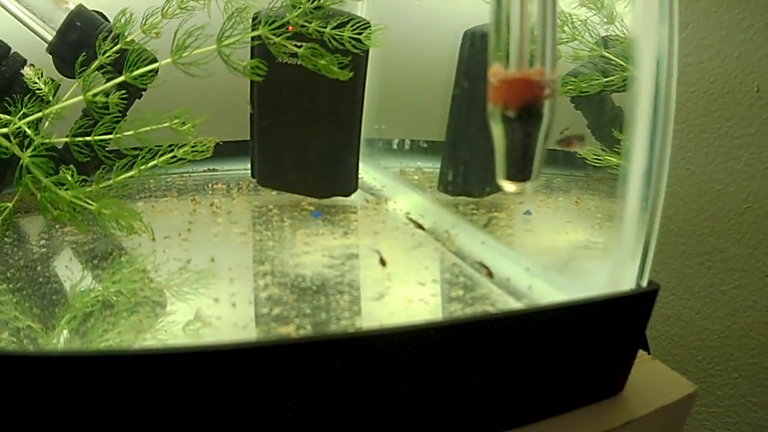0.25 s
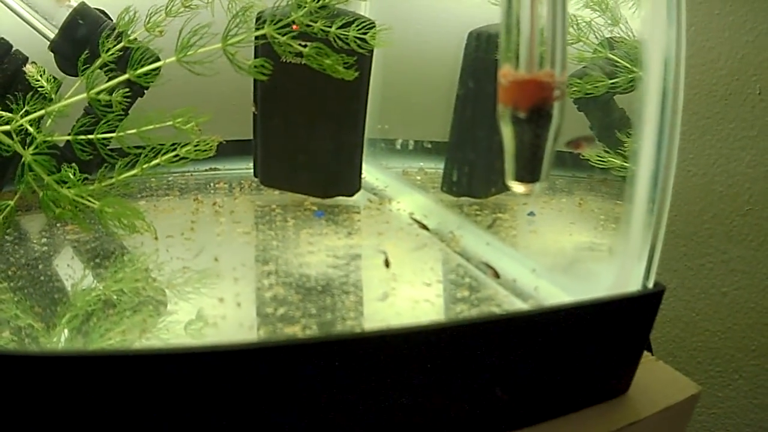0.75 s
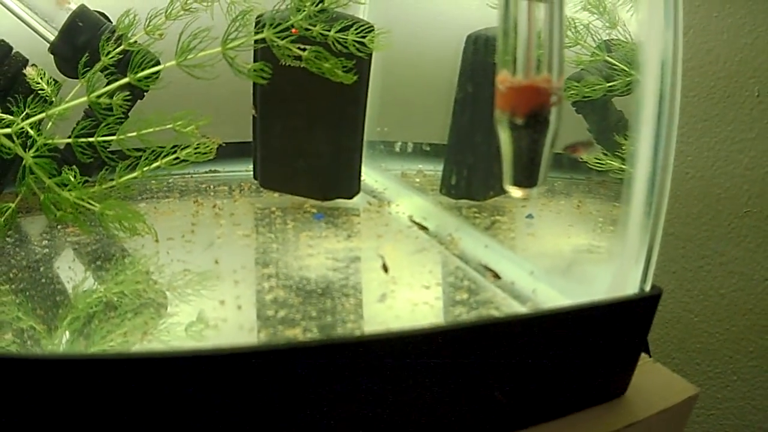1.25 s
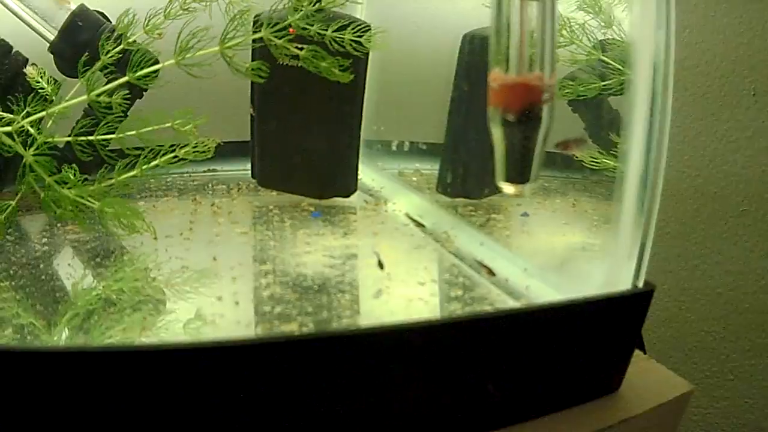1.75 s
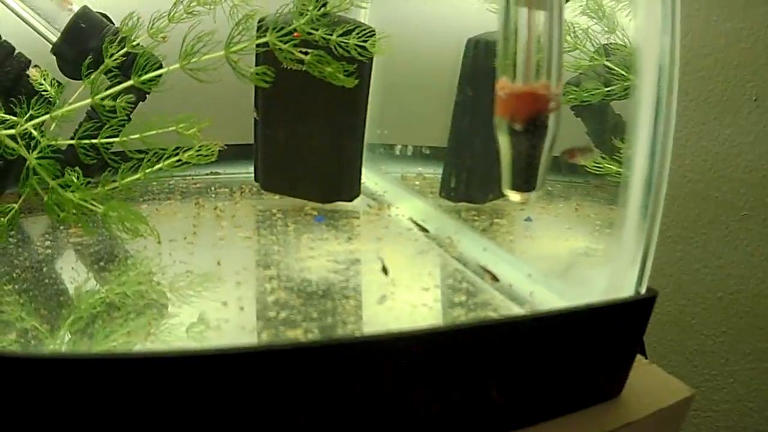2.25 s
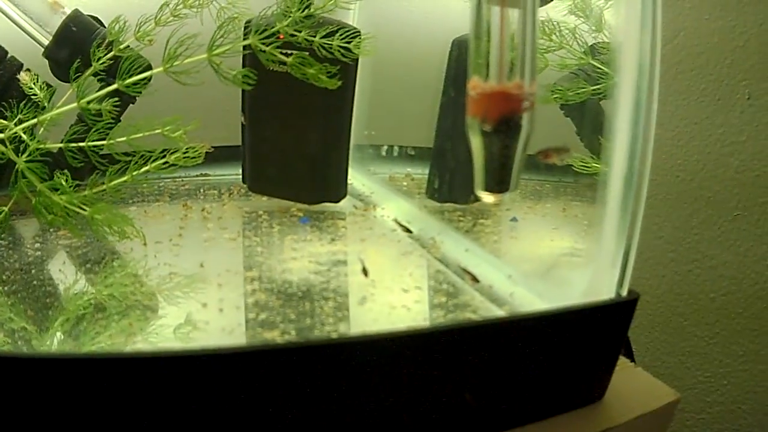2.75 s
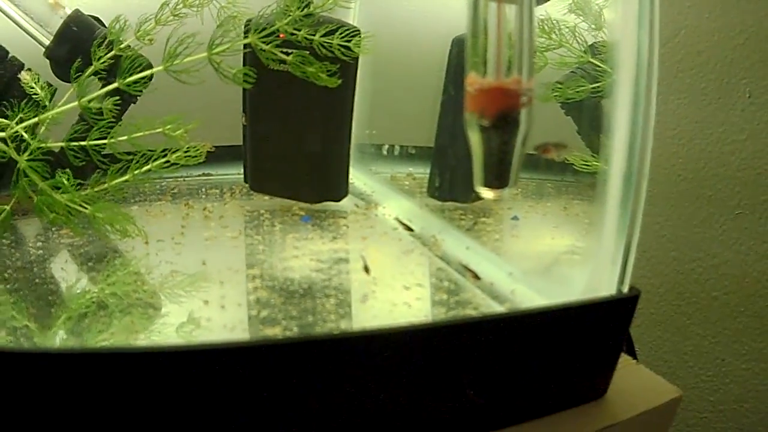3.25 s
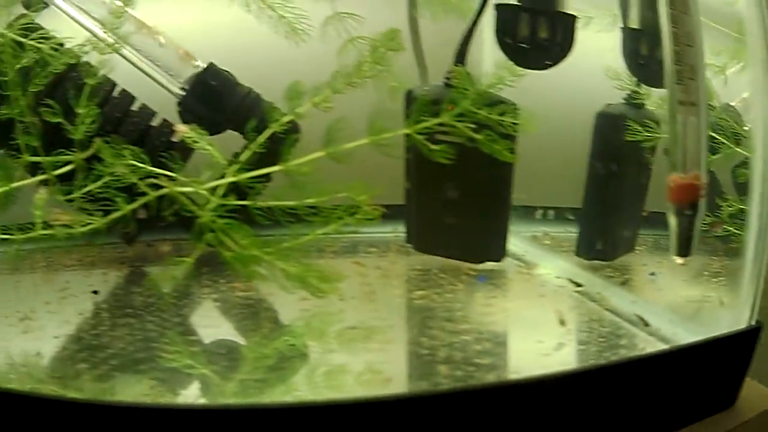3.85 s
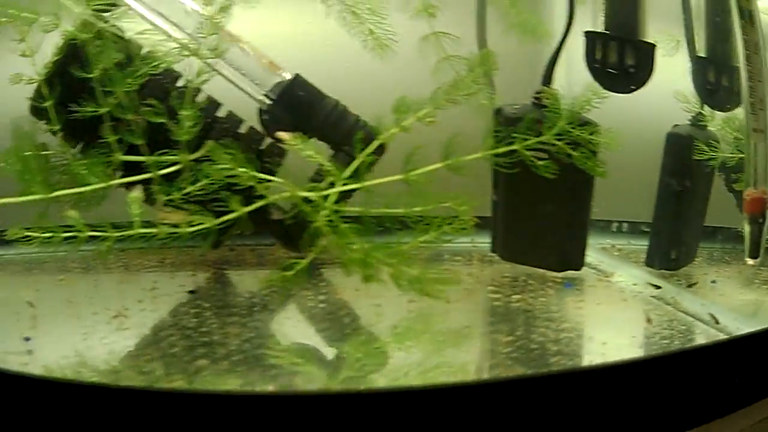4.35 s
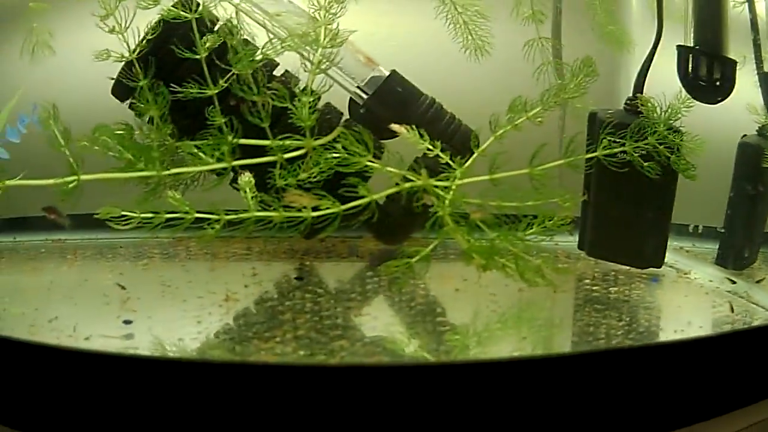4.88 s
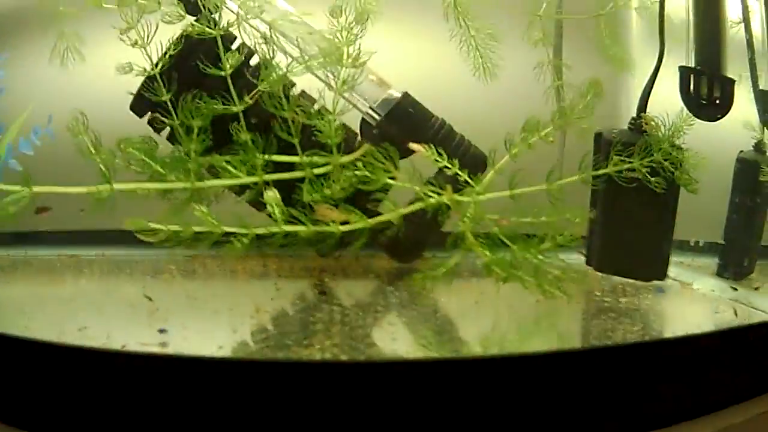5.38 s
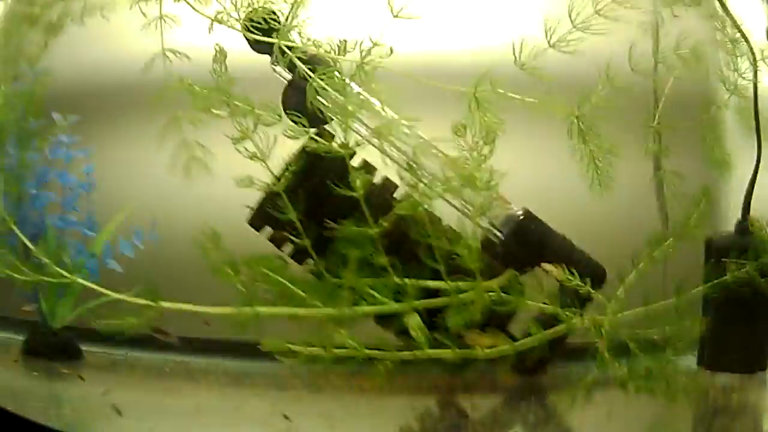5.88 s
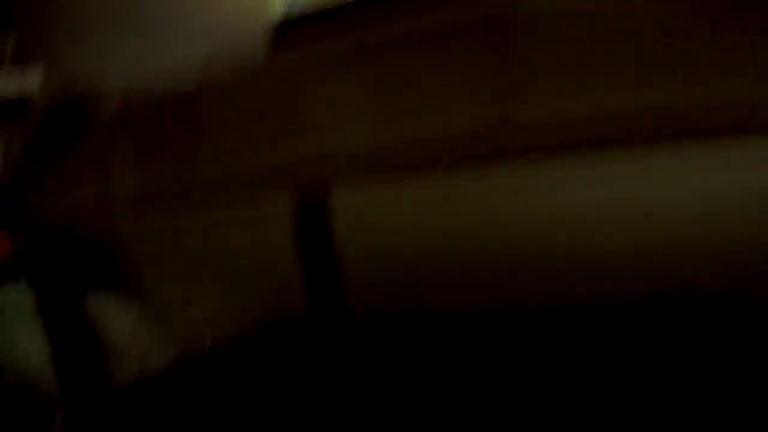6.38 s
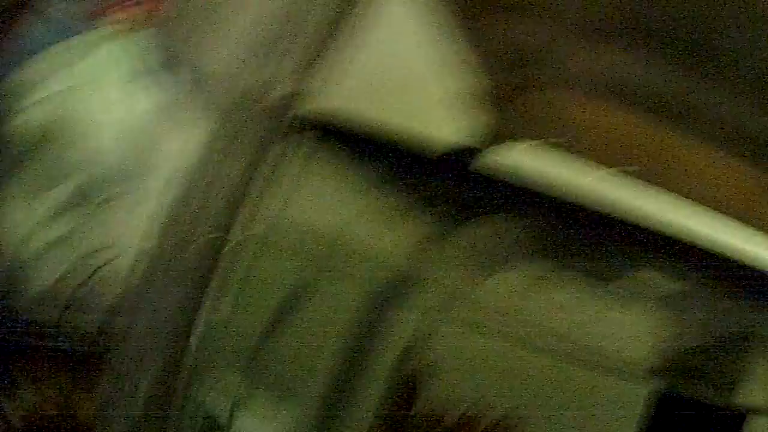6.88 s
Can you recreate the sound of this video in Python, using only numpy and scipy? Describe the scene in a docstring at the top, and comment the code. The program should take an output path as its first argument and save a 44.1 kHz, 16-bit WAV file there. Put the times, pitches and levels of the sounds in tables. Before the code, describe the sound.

An aquarium pump hums steadily with a thin whine, until clicks and one hard knock hit the microphone near the end.

```python
"""An aquarium air pump hums at mains frequency beside a small whining motor, over the soft wash of filters and
air. A hand-held camera drifts past the tank and swings away: its case clicks, creaks and takes one hard knock.
The sound is mono and narrow-band, ending near 4 kHz, and the input overloads on the knock."""
import sys
import numpy as np
from scipy.fft import rfft, irfft, next_fast_len
from scipy.io import wavfile
from scipy.ndimage import map_coordinates

SR = 44100
rng = np.random.default_rng(int(sys.argv[2]) if len(sys.argv) > 2 else 0)


def inscribe(sig):
    """Save sig as 16-bit PCM at rate SR to the path in sys.argv[1].

    A 1-D sig is mono; a 2-D sig holds one channel per row.
    Samples are clipped to [-1, 1] before scaling.
    """
    pcm = np.round(np.clip(np.atleast_2d(sig).T, -1, 1) * 32767)
    wavfile.write(sys.argv[1], SR, pcm.astype(np.int16))


N = 313991

# the drones as the microphone moves: (s, pump dB, whine order 2 dB, whine order 3 dB)
DRONES = [(0.0, -17.5, -41.5, -45), (0.42, -18, -39.5, -60.5), (1.57, -17.5, -39.5, -56.5), (1.72, -18, -40, -54.5),
          (1.94, -18, -39, -54), (2.64, -18, -39.5, -51), (3.09, -18, -39, -59.5), (3.47, -18, -40, -56.5),
          (3.77, -18, -41, -53), (3.98, -18, -40.5, -46), (5.43, -19, -40.5, -36), (5.89, -19.5, -41, -37.5),
          (6.27, -19, -41, -37), (6.41, -20, -44.5, -34.5), (6.56, -22.5, -41.5, -38), (6.76, -23.5, -39, -48.5),
          (6.98, -27, -34.5, -54), (7.12, -29, -36.5, -47.5)]
MAINS_HZ = 60  # fixed
WHINE_HZ = 166.7  # fixed
# overtones of the pump's diaphragm: (multiple of mains, dB re the fundamental)
PUMP = [(2, -28), (3, -26), (4, -29.5), (5, -27.5), (7, -32.5), (9, -33), (10, -36.5), (15, -38)]
# weak upper lines of the motor: (order, dB rms)
WHINE = [(4, -48.5), (5, -58), (6, -58)]
# moving water and air: (Hz, dB per Hz)
WASH = [(20, -2.5), (45, -3.5), (100, -6), (170, -5.5), (290, -4), (450, -3.5), (580, -8.5), (750, -6), (1000, -11), (1350, -15.5), (2000, -25.5), (4000, -34)]
# even hiss: (Hz, dB per Hz)
HISS = [(500, -17), (1100, -12.5), (1500, -10), (1850, -4.5), (2100, 1), (2400, 3), (2650, -4.5), (3200, -5), (3700, -7), (4200, -11)]
# (s, wash dB, hiss dB)
BED = [(0, -36.5, -40), (3.5, -36.5, -40), (4.5, -37.5, -40), (5.4, -37.5, -39), (6.3, -38, -39), (6.8, -38.5, -40.5), (7.12, -37, -34.5)]
# plastic case of the camera: (Hz, width Hz, dB)
CASE = [(1055, 160, -4.5), (1230, 180, -2), (1890, 240, -8.5), (2600, 230, -1.5), (2686, 280, -4.5), (3470, 850, -15)]
# clicks of the case: (s, peak dB, pitch Hz, life in cycles)
CLICKS = [(5.5315, -11, 1000, 3.2), (5.561, 1, 2480, 4.4), (5.5975, -20.5, 1700, 5), (5.726, -20, 2300, 6), (5.7886, -24.5, 1300, 5.9), (5.8813, -15.5, 1270, 14),
          (5.903, -14.5, 2200, 6), (5.9203, -2.5, 3450, 3.1), (5.9701, -11.5, 1400, 6.4), (6.3793, -6.5, 1560, 3.6), (7.0307, 3.5, 1320, 5.5), (7.0342, -11.5, 2370, 14)]
# creaks under the fingers: (start s, length s, rms dB)
CREAKS = [(5.926, 0.02, -23.5), (6.0962, 0.041, -19.5), (7.0146, 0.0084, -22)]
# contacts that bump the camera: (s, signed push in full scales, push time s, rattle dB, rattle t60 s)
BUMPS = [(6.0054, -.7, 0.0022, -9.5, 0.029), (6.008, -0.22, .002, 8, .045), (6.0126, -1.3, 0.0044, -0.5, 0.019), (6.0204, 0.098, .002, -2, 0.048), (7.0165, 0.7, 0.0022, -25.5, 0.023), (7.0212, -0.39, 0.0047, -35, .03)]
TOP_HZ = 15800  # fixed
# standing waves that colour the wash: (Hz, width Hz, dB)
STANDING = [(18, 7.8, 0), (198, 22, -3.5), (285, 12, 3.5), (348, 28, 2.5), (401, 13, -6), (407, 12, 4.5), (468, 15, 4.5), (514, 15, -7.5), (647, 12, -4.5), (683, 39, 3), (785, 15, -3.5), (1120, 8.3, -1)]
# the hand on the camera: (s, rustle dB, rumble dB)
GRIP = [(0, -69, -72.5), (5.3, -64.5, -61.5), (5.5, -49, -50.5), (5.56, -40.5, -34.5), (5.63, -37, -43.5), (5.68, -44.5, -45), (5.8, -46, -39.5), (5.86, -40.5, -35), (5.93, -39.5, -38),
        (5.98, -37.5, -42), (6.07, -32, -39.5), (6.14, -36.5, -49), (6.17, -54, -54), (6.38, -48.5, -39.5), (6.5, -49, -58), (6.65, -40.5, -52), (6.77, -45.5, -55.5),
        (6.82, -33.5, -58.5), (6.87, -45.5, -58), (6.94, -35.5, -58), (7.02, -32.5, -45), (7.07, -37.5, -42), (7.11, -30.5, -43)]
# soft low swells in the wash: (s, length s, rms dB)
SWELLS = [(0.364, .1, -38.5), (4.563, .1, -42.5)]
# the narrow band the sound is heard through: (Hz, dB)
BAND = [(0, 0), (3500, 0), (3750, 0), (4000, -9), (4250, -13), (4450, -26), (4650, -60), (5000, -110)]
# colour of the rattle: (Hz, dB per Hz)
RATTLE = [(80, -1.5), (150, -1), (230, -8.5), (320, 6), (450, -3.5), (650, -7.5), (850, 4), (1100, -3), (1350, 2.5), (1700, -12), (2100, -6), (2650, -3.5), (3300, -11), (4200, -17.5)]
# a small hard part left ringing by the knock: (Hz, peak dB, t60 s)
PING = [(1900, -7.5, 0.12)]
# skin sliding on the case: (Hz, dB per Hz)
RUSTLE = [(200, -19), (700, -13.5), (1100, 0.5), (1400, -1.5), (1700, -4.5), (2100, -0.5), (2700, -0.5), (3600, -3.5), (4100, -10), (4700, -60.5)]
PING_S = 6.0205  # fixed


def amp(db):
    """Decibels to gain."""
    return 10 ** (np.asarray(db) / 20)


def unit(x):
    """Scale to rms 1."""
    return x / np.sqrt(np.mean(x ** 2) + 1e-20)


def curves(rows):
    """One value per sample for each column after the time."""
    s, *cols = np.transpose(rows)
    return [np.interp(np.arange(N) / SR, s, c) for c in cols]


def wobble(rate):
    """A smooth random curve, rate knots a second."""
    return map_coordinates(rng.standard_normal(int(N * rate / SR) + 4), [np.arange(N) * rate / SR])


def filtered(x, response):
    """x times a complex response of frequency."""
    n = x.shape[-1]
    m = next_fast_len(n + SR // 2)
    return irfft(rfft(x, m) * response(np.fft.rfftfreq(m, 1 / SR)), m)[..., :n]


def noise(spectrum):
    """Noise of rms 1 with the colour of (Hz, dB) points."""
    f, db = np.transpose(spectrum)
    return unit(filtered(rng.standard_normal(N), lambda hz: amp(np.interp(np.log(hz + 1), np.log(f), db))))


def add(track, s, sound):
    """Mix a sound into the track at time s."""
    part = track[round(s * SR):][:len(sound)]
    part += sound[:len(part)]


def case(f):
    """Response of the case's resonances."""
    return sum((-1) ** k * amp(db) * 1j * f * w / (c * c - f * f + 1j * f * w) for k, (c, w, db) in enumerate(CASE))


def tone(hz, drift=0):
    """A sine of rms 1 at a random phase."""
    return np.sqrt(2) * np.sin(2 * np.pi * (hz * np.arange(N) / SR + rng.random()) + drift)


def pump(gain_db=0.0, flutter_db=0.36):
    """The diaphragm swings with the mains; back pressure makes its overtones flutter."""
    overtones = sum(amp(db + flutter_db * wobble(3.5)) * tone(round(k) * MAINS_HZ) for k, db in PUMP)
    return amp(curves(DRONES)[0] + gain_db) * (tone(MAINS_HZ) + overtones)


def motor(second_db=0.5, third_db=1.5, drift=0.22, flutter_db=1.0):
    """A slightly unsteady whine; standing waves trade one order for another, and the upper lines fade away from the tank."""
    near, second, third = curves(DRONES)
    slip = drift * wobble(1.5)
    orders = [(2, second + second_db), (3, third + third_db)] + [(k, db + near - near.max()) for k, db in WHINE]
    return sum(amp(db + flutter_db * wobble(12)) * tone(round(k) * WHINE_HZ, k * slip) for k, db in orders)


def filters(churn_db=0.6, swell_hz=220):
    """The flow churns gently under a smooth hiss and now and then swells in the bass."""
    wash_db, hiss_db = curves(BED)
    wash = amp(wash_db + churn_db * wobble(11)) * unit(filtered(noise(WASH), room))
    t = np.arange(N) / SR
    swell = sum(amp(db) * np.exp(-((t - s) / length) ** 2) for s, length, db in SWELLS)
    return wash + swell * noise([(swell_hz / 2, -60), (swell_hz, 0), (swell_hz * 2, -60)]) + amp(hiss_db) * walls(noise(HISS))


def clicks(ring_db=-3):
    """Each click is a few cycles that swell and die, and sets the case ringing."""
    out, t = np.zeros(N), np.arange(SR // 20) / SR
    for s, db, hz, cycles in CLICKS:
        snap = -np.sin(2 * np.pi * hz * t) * t * amp(-80 * hz * t / cycles)
        snap = snap + amp(ring_db) * filtered(snap, case)
        add(out, s, amp(db) * snap / np.abs(snap).max())
    return out


def creaks(slips_per_s=750, scatter=0.3):
    """Plastic sticks and slips at an uneven rate, ringing the case as the pressure jumps and eases."""
    out = np.zeros(N)
    for s, length, db in CREAKS:
        times = np.cumsum(np.exp(scatter * rng.standard_normal(size=80))) / slips_per_s
        times = (times - times[0])[times - times[0] < length]
        pressure = .25 + np.sin(np.pi * (times / length) ** .6) ** .5  # fixed
        slips = np.bincount((times * SR).astype(int), pressure * rng.uniform(0.45, 1, size=80)[:len(times)], SR // 10)
        ring = filtered(slips, case)
        add(out, s, amp(db) * ring * np.sqrt(length * SR / np.sum(ring ** 2)))
    return out


def bumps(attack_s=0.00038):
    """Each contact shoves the microphone and rattles the case; the hard knock leaves a thin ring."""
    out, t = np.zeros(N), np.arange(SR // 4) / SR
    shake = noise(RATTLE)
    for s, size, push_s, rattle_db, t60 in BUMPS:
        u = t / push_s
        push = u ** 2 * np.exp(1 - u ** 2)  # one smooth shove that peaks at the push time
        rattle = np.roll(shake, -round(s * SR))[:len(t)] * amp(rattle_db - 60 * t / t60) * (1 - np.exp(-t / attack_s))
        add(out, s, size * push + rattle)
    for hz, db, t60 in PING:
        add(out, PING_S, amp(db - 60 * t / t60) * np.sin(2 * np.pi * hz * t))
    return out


def room(f):
    """Narrow peaks and dips of the standing waves."""
    return amp(sum(db * np.exp(-((f - hz) / width) ** 2) for hz, width, db in STANDING))


def grip(grains_per_s=2600):
    """Skin slides over the case in tiny uneven grains; the hand itself rumbles."""
    rustle_db, rumble_db = curves(GRIP)
    grains = rng.standard_normal(N) * (rng.random(N) < grains_per_s / SR)
    rustle = unit(filtered(grains, lambda f: amp(np.interp(f, *np.transpose(RUSTLE)))))
    return amp(rustle_db) * rustle + amp(rumble_db) * noise([(20, -11), (60, -8), (100, -0.5), (150, -12.5), (400, -40.5), (1000, -69)])


def walls(x, echo_db=-22, count=12):
    """Glass and walls nearby return weak copies that comb the sound."""
    delays = rng.uniform(.003, .03, count)  # fixed
    return unit(x + amp(echo_db) * sum(np.roll(x, int(d * SR)) for d in delays))


def passband(f):
    """Gain of the narrow band that ends near 4 kHz."""
    return amp(np.interp(f, *np.transpose(BAND)))


def scene():
    """Everything reaches one microphone, which feeds both channels."""
    mono = pump() + motor() + filters() + grip() + clicks() + creaks() + bumps()
    return np.array([mono, mono])


def record(dry, overload=1.5, block_hz=6):
    """The input overloads, recovers through its coupling capacitor, is cut to telephone bandwidth and clips at full scale."""
    lag_s = np.array([[1 / 16000], [-1 / 16000]])  # fixed
    opening = np.sin(np.pi / 2 * np.minimum(np.arange(N) / (.004 * SR), 1)) ** 2  # fixed
    overloaded = np.clip(dry * opening, -overload, overload)
    # the left channel runs a fraction of a millisecond behind the right
    narrow = filtered(overloaded, lambda f: passband(f) * 1j * f / (block_hz + 1j * f) * np.exp(-2j * np.pi * f * lag_s))
    return filtered(np.clip(narrow, -1, 1), lambda f: 1 / (1 + (f / TOP_HZ) ** 60))  # fixed


dry = scene()
out = record(dry)
inscribe(out)
```